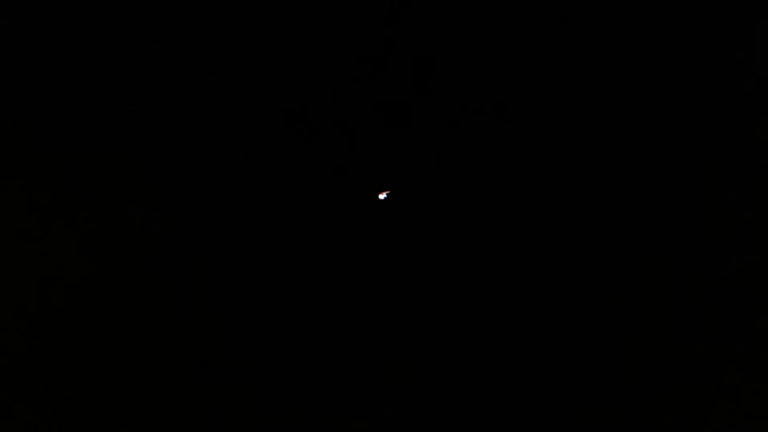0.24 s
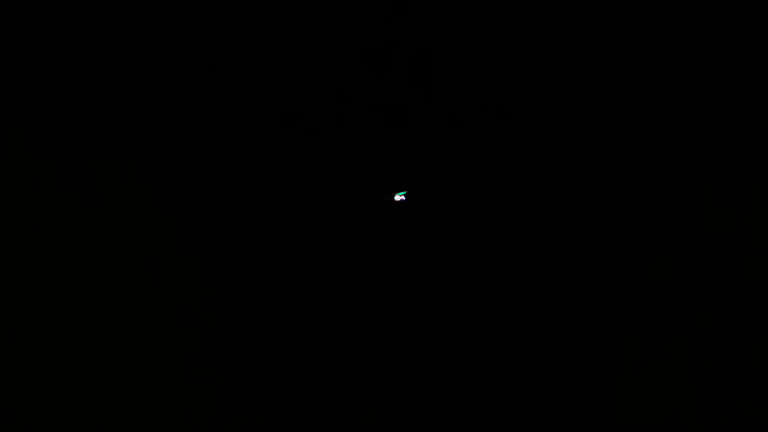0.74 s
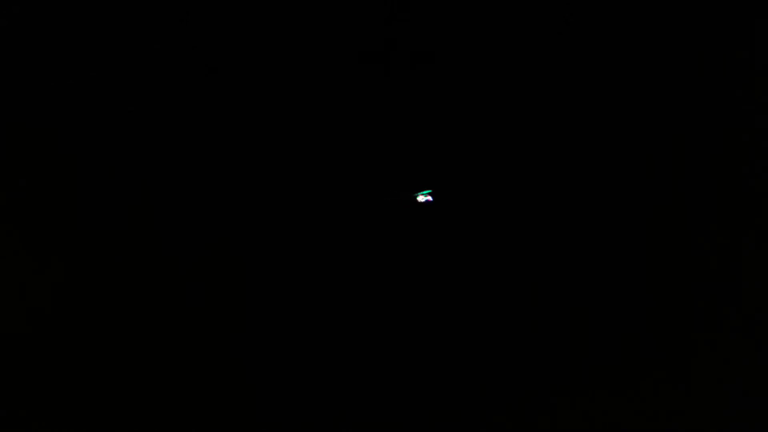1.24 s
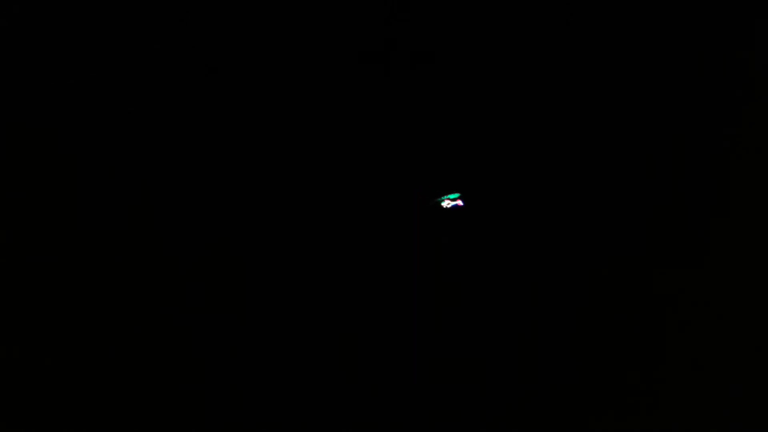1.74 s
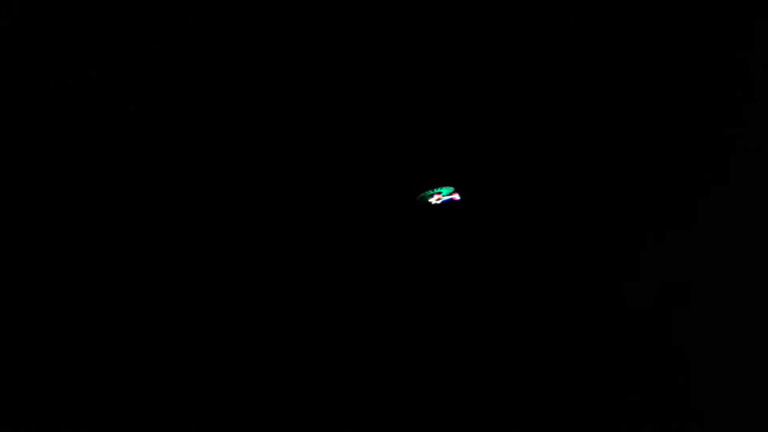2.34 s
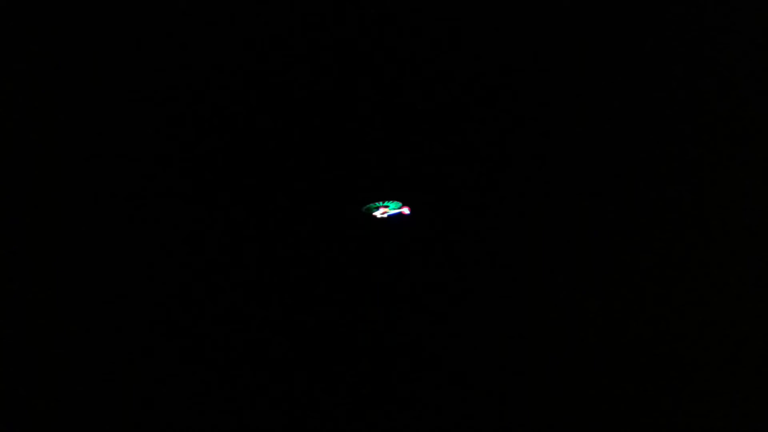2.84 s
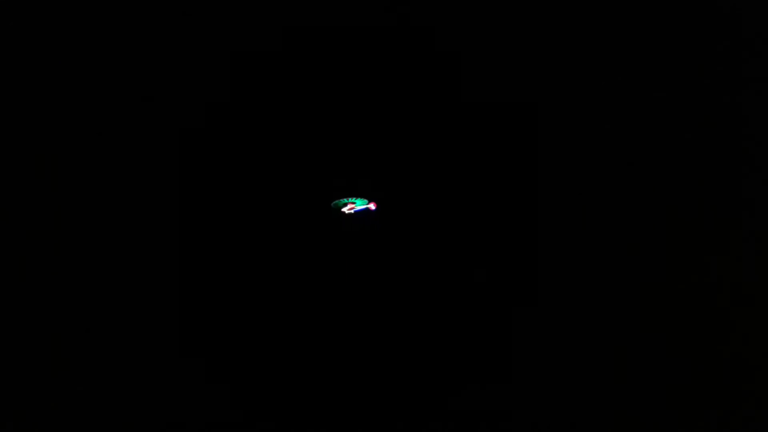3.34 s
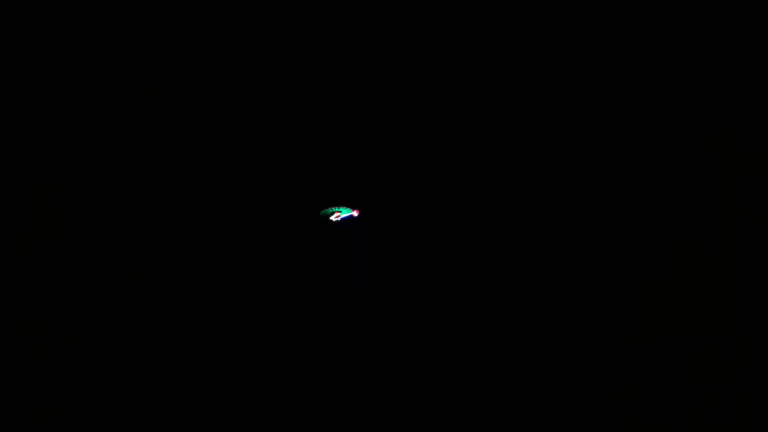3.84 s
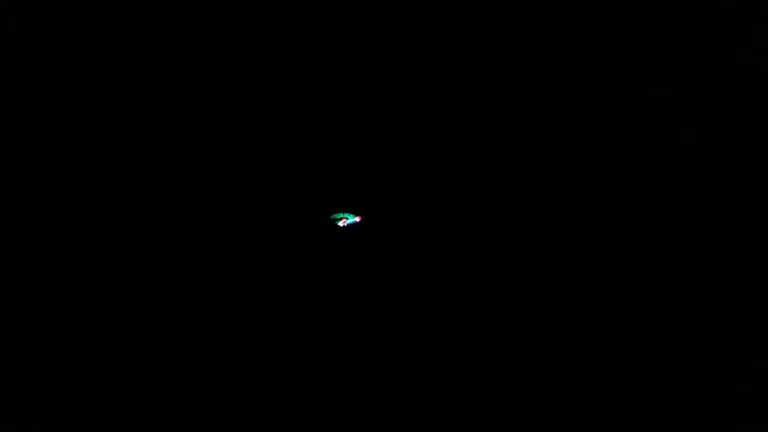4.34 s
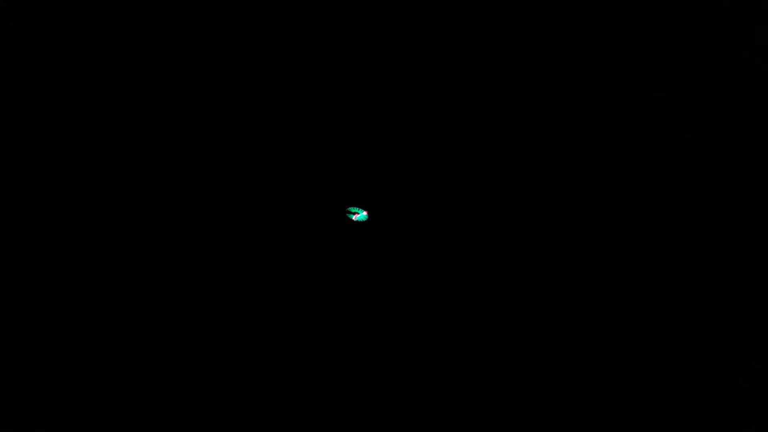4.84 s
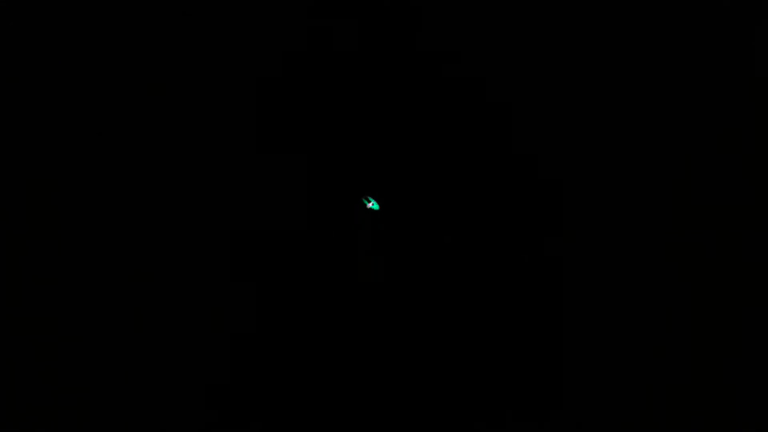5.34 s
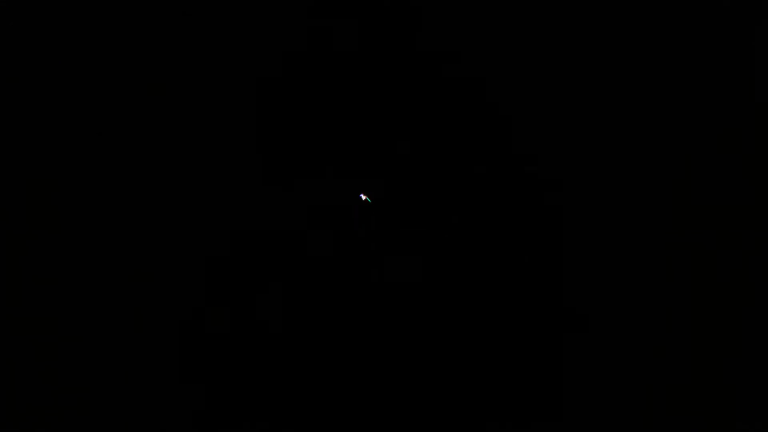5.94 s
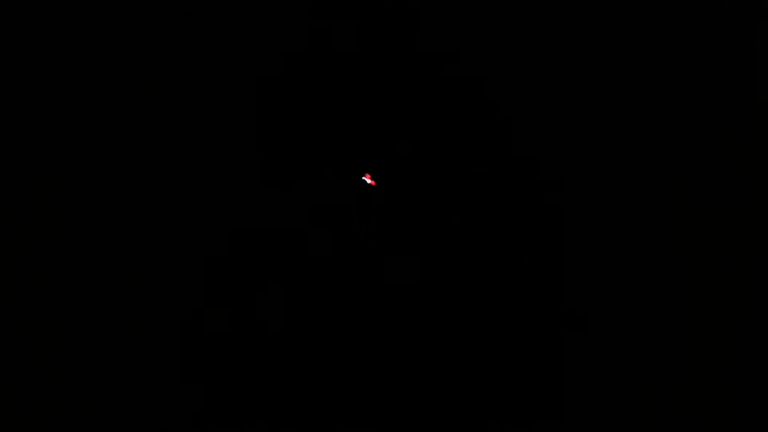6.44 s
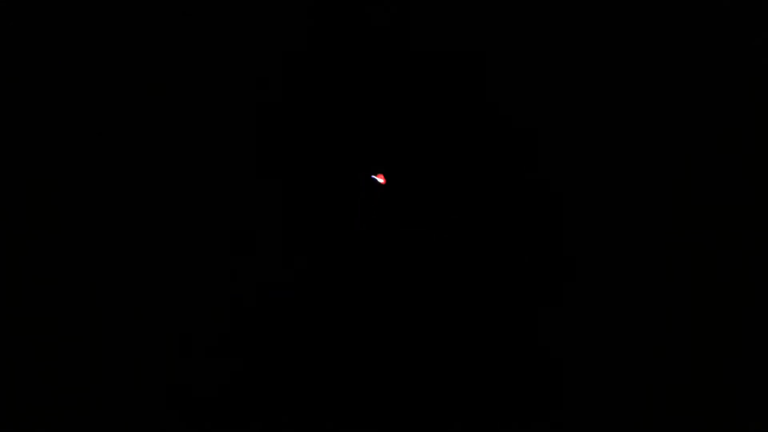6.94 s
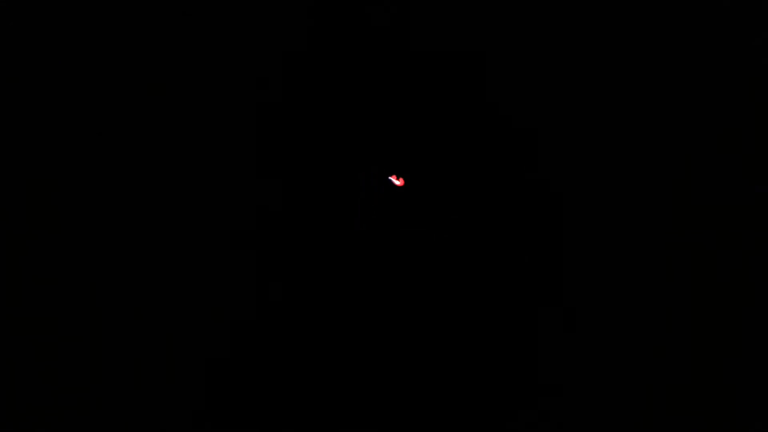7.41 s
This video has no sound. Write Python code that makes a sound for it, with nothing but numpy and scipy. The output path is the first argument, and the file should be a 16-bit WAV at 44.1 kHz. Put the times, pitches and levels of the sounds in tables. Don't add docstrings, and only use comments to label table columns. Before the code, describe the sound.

In the open on a breezy night, a small electric model helicopter flies some way from a handheld stereo microphone. At 0 s its tail rotor drones with a steady nasal buzz over soft blade rush, while a few wind knocks hit the left side. From 1 s the rush builds and thin gear whines emerge. Between 2 and 3.3 s it is loudest, a bright hissing wash with a sliding, hollow ground echo; the pitch glides gradually down. Hard gusts slam the right side from about 1.9 to 3.5 s, thudding and crackling into overload. From 3.5 s the rush ebbs and separate high whines glint in turn, clear around 5 s, as more slaps hit the right at 4.8 to 5.5 s. Near 6 s the rush is faintest and the whine lowest. Then the buzzing drone grows again and pitch climbs slightly until 7.6 s, cutting off while still flying.

```python
import sys
import numpy as np
from scipy import signal
from scipy.fft import rfft, irfft
from scipy.io import wavfile
from scipy.ndimage import uniform_filter1d, map_coordinates

SR = 44100
rng = np.random.default_rng(int(sys.argv[2]) if len(sys.argv) > 2 else 0)


def file_out(sig):
    cols = np.atleast_2d(sig).T
    lim = np.clip(cols, -1, 1)
    pcm = np.round(lim * 32767).astype(np.int16)
    wavfile.write(sys.argv[1], SR, pcm)


def gain_from_db(level_db):
    decades = np.asarray(level_db, float) / 20
    return 10 ** decades


N = 338247
TIME = np.arange(N) / SR

# time in seconds, rush level in dB, extra treble in dB.
RUSH_PASS = [(0, -43.5, -1.5), (.45, -42.5, -1), (.87, -39.5, -1), (1.41, -35, 1), (1.81, -35.5, 1),
             (2.11, -31.5, 5.5), (2.38, -28, -0.5), (2.63, -31, 1.5), (3.05, -25.5, 1.5), (3.35, -32, 4),
             (4.1, -34, 2.5), (4.6, -34.5, 2), (5.25, -41, 8), (5.95, -48, 6.5), (6.34, -46, 9),
             (6.66, -43, 0), (7.28, -40, -4.5), (7.67, -40.5, -3)]


def curves(table):
    s, *columns = np.transpose(table)
    return [np.interp(TIME, s, c) for c in columns]


def unit(x):
    return x / np.sqrt(np.mean(x ** 2))


def walk(rate):
    hold = int(SR / rate)
    steps = np.repeat(rng.standard_normal(N // hold + 1), hold)
    return 1.36 * uniform_filter1d(uniform_filter1d(steps, hold), hold)[:N]


def delayed(x, samples):
    return map_coordinates(x, [np.arange(N) - samples], order=3, mode="nearest")


def butter(x, hz, kind, order=2):
    return signal.sosfilt(signal.butter(order, hz, kind, fs=SR, output="sos"), x)


def night_air():
    noise = rng.standard_normal((2, N))
    rumble = gain_from_db(-30) * butter(noise, [110, 260], "band", order=2)
    hiss = gain_from_db(-57.5) * butter(noise, 13500, "low", order=1)
    return rumble + hiss


def wind(gusts, slaps):
    power = np.zeros(N)
    for s, db, ms in gusts:
        reach_s, width_s = ms / 300, 0.88 * ms / 1000
        near = slice(max(int((s - reach_s) * SR), 0), int((s + reach_s) * SR))
        power[near] += gain_from_db(2 * db) * np.exp(-((TIME[near] - s) / width_s) ** 2)
    stir_length = int(.09 * SR)
    stir = uniform_filter1d(uniform_filter1d(power, stir_length), stir_length)
    speed = np.sqrt(power + gain_from_db(-25.5) * np.abs(stir) + gain_from_db(-100))

    eddies_per_s = 650
    eddies = unit((rng.random(N) < eddies_per_s / SR) * rng.standard_normal(N)) * speed
    bright = np.clip(2.76 * speed ** 0.9, 0, 1)
    slow_flow = gain_from_db(21.0) * butter(eddies * (1 - bright), 329.0, "low", order=3)
    fast_flow = gain_from_db(17.0) * butter(eddies * bright, 481, "low", order=3)
    flow = 0.91 * np.tanh((slow_flow + fast_flow) / 0.87)

    hits = np.zeros(N)
    s, db = np.transpose(slaps)
    hits[(s * SR).astype(int)] = gain_from_db(db + 41.5) * rng.choice([-1, 1], len(s))
    return butter(flow + butter(hits, 870, "low", order=4), 194.2, "high", order=5)


def wind_left():
    # time in seconds, level in dB, length in ms.
    gusts = [(0.026, -9, 11), (0.082, -16.5, 21), (0.154, -32, 8.8), (0.184, -4.5, 5), (0.208, -32, 6.7),
             (0.269, -33.5, 8.5), (0.625, -30, 19), (0.742, -28, 15), (0.816, -23.5, 9.5),
             (0.866, -20.5, 18.5), (0.982, -26.5, 17), (1.323, -37, 27), (1.425, -29, 26),
             (1.624, -27, 14.5), (2.652, -31, 25), (2.714, -31, 10), (3.017, -32, 39), (3.231, -27, 12),
             (5.027, -29, 9.1), (5.082, -36, 11), (5.116, -21, 6.7), (5.19, -22, 8.6), (5.366, -31, 10),
             (6.22, -24.5, 8.1)]
    # time in seconds, level in dB.
    slaps = [
        (0.021, -22.5),
        (0.1843, -16.5),
    ]
    return wind(gusts, slaps)


def wind_right():
    # time in seconds, level in dB, length in ms.
    gusts = [(.788, -20.5, 12), (1.247, -13.5, 19), (1.906, -19, 28), (1.952, -9.5, 14.5), (2.017, -15, 42),
             (2.101, -8.5, 14), (2.177, -12, 17), (2.233, -10.5, 35), (2.337, -15.5, 48), (2.426, -5.5, 55),
             (2.496, -1, 4.9), (2.602, -4, 31), (2.871, -21.5, 15), (2.999, -8.5, 29), (3.065, -2, 13.7),
             (3.207, -16, 20), (4.182, -22, 32), (4.348, -31, 15), (4.436, -29.5, 26), (4.616, -27.5, 14),
             (4.845, -8.5, 29), (5.043, -10.5, 26), (5.162, -17.5, 19), (5.19, -9.5, 11), (5.252, -19, 14),
             (5.873, -24, 14), (6.256, -34.5, 31), (7.451, -24, 4.7), (5.76, -36.5, 14)]
    # time in seconds, level in dB.
    puffs = [(0.975, -24), (1.149, -23.5), (1.199, -28), (2.069, -27), (2.135, -22.5), (2.65, -5),
             (2.698, -3.5), (2.73, -4), (2.78, -6), (2.901, -9.5), (2.967, -9), (3.122, -16.5),
             (3.241, -29), (3.39, -16.5), (3.433, -21), (3.486, -19), (3.636, -25), (3.673, -20),
             (4.307, -21.5), (4.494, -26.5), (4.77, -22), (4.796, -13), (4.929, -25), (5.074, -5),
             (5.112, -14), (5.297, -14), (5.387, -13.5), (5.476, -19), (7.591, -25)]
    puff_ms = 5.3
    # time in seconds, level in dB.
    slaps = [(2.4544, -14.5), (2.497, -15.5), (2.5642, -5.5), (2.5726, -14), (2.589, -13), (2.598, -11.5),
             (2.607, -6), (2.6501, -7.5), (2.7048, -12), (2.7303, -8), (3.0559, -8), (4.771, -23),
             (4.799, -15.5), (4.8234, -16), (4.843, -12), (4.851, -15), (4.872, -16), (5.0068, -14),
             (5.025, -15), (5.0326, -11), (5.0694, -19), (5.0783, -12.5), (5.1075, -18), (5.1623, -11.5),
             (5.179, -19), (5.1891, -1.5), (5.2927, -18.5)]
    return wind([*gusts, *[(s, db, puff_ms) for s, db in puffs]], slaps)


def rush(turns):
    # pitch in Hz, level in dB per Hz.
    rush_colour = [(100, -35.5), (300, -25.5), (700, -10), (1500, -6), (2900, -10), (3900, 10),
                   (4600, -7.5), (5600, -22.5), (7000, -20.5), (8200, -25.5), (9600, -37), (10600, -45),
                   (15000, -59)]
    level_db, edge_db = curves(RUSH_PASS)
    bite_db = 7 + 0.27 * edge_db
    air_db = -8 + 0.74 * edge_db

    even_n = N + N % 2
    hz = np.fft.rfftfreq(even_n, 1 / SR)[1:]
    colour_hz, colour_db = np.transpose(rush_colour)
    shape = np.r_[0, gain_from_db(np.interp(np.log(hz), np.log(colour_hz), colour_db))]
    noise = irfft(rfft(rng.standard_normal((3, even_n))) * shape)[:, :N]

    body = unit(butter(noise, 3087, "low", order=4)) * gain_from_db(level_db - 0.5 + 0.16 * walk(6.8))
    bite = unit(butter(noise, [2800, 5200], "band", order=3)) * gain_from_db(level_db + bite_db - 6.5 + 0.13 * walk(12))
    air = unit(butter(noise, 5176, "high", order=4)) * gain_from_db(level_db + air_db + 1.5 + 1.1 * walk(9.9))
    throb_db = 1.0 * np.sin(2 * np.pi * turns * .187)
    swell_db = .9 * walk(14) + throb_db
    return (body + bite + air) * gain_from_db(swell_db)


def tone(turns, order, db, flutter_db, loose=1):
    level = np.sqrt(2) * gain_from_db(db + flutter_db * walk(25))
    return level * np.cos(2 * np.pi * (order * turns + loose * rng.random()))


def tail_rotor(turns):
    # time in seconds, level in dB, sharpness of the pulse in dB per octave, even over odd harmonics in dB.
    tail = [(0, -39, -13, -4), (.3, -45.5, -2, -0.5), (1.3, -41.5, -1, 6.5), (2, -44, -2.5, 6.5),
            (2.6, -42.5, 1, 3), (2.95, -40.5, 1.5, 4.5), (3.8, -48, 2.5, 2.5), (4.15, -50.5, 0.5, 7),
            (4.42, -48.5, 2.5, -2), (5, -56, 2, 0), (5.3, -58.5, 5, -3), (5.7, -61.5, 3, 5),
            (6.2, -54, -0.5, -3), (6.5, -49.5, 0.5, 1), (7.08, -46, 0.5, -1), (7.67, -42.5, 0, -0.5)]
    tail_swells = {3: (6.33, 9.2, 0.79), 4: (0.91, 4.2, 0.39), 5: (6.7, 7, 0.43), 7: (7.31, 7.5, 0.26)}
    blade_turns = turns * .9537
    level_db, sharp_db, even_db = curves(tail)
    share_db = [-3, -4.5, -8, -4.5, -5.0, -8, -10.0] + [-10 - 2.55 * k for k in range(6)]
    for harmonic, (s, gain_db, width) in tail_swells.items():
        share_db[harmonic - 1] = share_db[harmonic - 1] + gain_db * np.exp(-((TIME - s) / width) ** 2)

    drone = np.zeros(N)
    for k, db in enumerate(share_db):
        pulse_db = sharp_db * np.log2(max(k, 1)) - even_db / 2 * (-1) ** k
        drift_db = 1.2 * walk(2.405)
        drone += tone(blade_turns, k + 1, level_db + db + pulse_db + drift_db, flutter_db=1.5, loose=0.42)
    return drone


def glints(lobes, off_beam_db):
    t = TIME[::128]
    beam = sum(gain_from_db(2 * db) * np.exp(-((t - s) / width) ** 2) for s, db, width in lobes)
    off_beam = gain_from_db(2 * (curves(RUSH_PASS)[0] + off_beam_db))
    return 10 * np.log10(off_beam + np.interp(TIME, t, beam))


def gears(turns):
    # time in seconds, peak in dB, half width in seconds (its sign is ignored).
    mesh = [(.5, -62, 1), (1.402, -41.5, 0.08), (2.1, -38.5, 0.32), (3.05, -30.5, 0.17), (3.83, -33, 0.18),
            (4.33, -37, 0.12), (4.98, -39, 0.23), (5.9, -41.5, 0.13), (6.43, -35.5, 0.19),
            (6.85, -40.5, 0.2)]
    mesh_side = [(1.552, -53, 0.33), (2.08, -54, 0.41), (2.63, -47, 0.27), (3.05, -39, 0.12),
                 (3.44, -36, 0.27), (3.85, -41, 0.094), (4.42, -42.5, .18), (4.972, -41, 0.25),
                 (5.7, -51, 0.36), (6.352, -45, 0.16), (7.4, -52.5, 0.75)]
    motor = [(.2, -47.5, .08), (.98, -52, .08), (2.5, -48, .3), (3.15, -55, .1), (4.33, -50, .09),
             (4.75, -42.5, .08), (4.98, -33, 0.12), (5.3, -39, 0.1), (5.95, -41.5, 0.17),
             (6.37, -43.5, 0.11)]
    tail_drive = [(.39, -46, .1), (1.72, -41, 0.27), (3.129, -34, 0.22), (4.128, -36.5, 0.093),
                  (4.55, -40, .12), (5.31, -40.5, .07), (5.97, -43, 0.08), (6.468, -37, 0.23)]
    overtone = [(2.36, -48, 0.088), (2.56, -58, .07), (2.95, -45, .07), (4.8, -47, 0.34),
                (5.31, -43.5, 0.085), (5.88, -55, 0.2), (7.05, -60, 0.23)]
    third_mesh = [(1.4, -67, 0.17), (1.902, -73, .2), (2.35, -53.5, 0.34), (3.12, -52, 0.11), (4.2, -62, 1),
                  (5.4, -68, .15), (6.3, -70, 0.16)]
    upper = [(.72, -58, -7), (1.369, -55, -0.5), (3.6, -50, 1.3), (4.652, -39.5, .5), (5.66, -45, -3),
             (6.32, -49.5, -0.6), (7.3, -62, 1)]
    high_band = [
        (1.5, -72, 0.22),
        (2.1, -47, 0.39),
        (3.1, -50, .25),
        (4.4, -53, .2),
    ]
    # level between glints, in dB against the rush.
    off_beam = [-9.5, -31, -23, -27, -23, -44, -44]
    orders_of = {1: [14, 28, 27.39, 28.62, 26], 2: [15, 14.62, 34, 13], 3: [10, 11, 7, 8], 4: [13.38, 17.38,
                 19.38], 5: [18, 17, 18.62], 6: [42, 41.38, 40.77, 42.62, 40.1], 7: [20, 21, 22, 20.62, 24,
                 19]}
    order_db = [
        [2, -18, -29.5, -27, -39],
        [2.5, 1, -40, -4.5],
        [0, -11, -19, -19],
        [-1.5, -17, -13],
        [5, -36, -6],
        [3, -6, -3, -12, -12],
        [-5.5, -8.5, -32, -23, -21, -13],
    ]
    lobes = (mesh, mesh_side, motor, tail_drive, overtone, third_mesh, upper)
    family_db = [glints(*f) for f in zip(lobes, off_beam)]
    whine = np.zeros(N)
    for level_db, orders, offsets in zip(family_db, orders_of.values(), order_db):
        for order, db in zip(orders, offsets):
            whine += tone(turns, order, level_db + db, flutter_db=2.0)

    errors = rng.standard_normal(N)
    smear = unit(butter(errors, 330, "low", order=4)) * np.sin(2 * np.pi * 41.5 * turns)
    smear = smear * gain_from_db(family_db[5] + 7.0)
    band = unit(butter(errors[::-1], 200, "low", order=4)) * np.sin(2 * np.pi * 34.6 * turns)
    band = band * gain_from_db(glints(high_band, off_beam_db=-49))
    return whine + band + smear


def helicopter():
    # time in seconds, turns per second in Hz.
    shaft = [(0, 303.95), (.5, 304.9), (1.2, 304.17), (1.6, 302.61), (2, 300.16), (2.4, 296.64),
             (2.8, 290.8), (3.6, 282.6), (4, 280.18), (4.8, 277.21), (5.5, 274.05), (6, 273.24),
             (6.4, 274.61), (6.8, 277.02), (7.67, 284.3)]
    # time in seconds, lag of the ground echo in ms.
    ground = [(0, 2.67), (1.2, 3.06), (2.3, 3.46), (3.4, 3.3), (4.5, 2.63), (5.5, 2.59), (6.5, 3.08),
              (7.67, 3.5)]
    # lag in ms, share of the direct sound.
    body_echo = (1.6, .55)
    turns = np.cumsum(curves(shaft)[0]) / SR
    shared, *spread = rush(turns)
    ground_echo = gain_from_db(-7.5) * delayed(shared, curves(ground)[0] * SR / 1000)
    holder_echo = body_echo[1] * delayed(shared, body_echo[0] * SR / 1000)
    return shared + ground_echo + holder_echo + gears(turns) + tail_rotor(turns), spread


def scene():
    # lag in ms, left share, right share.
    casing = [
        (.12, 0.38, 0.3),
        (.24, 0.083, 0.24),
        (0.449, 0.35, 0.24),
        (1.102, 0.21, -0.0035),
    ]
    # time in seconds, lag in samples.
    port_lag = [
        (0, 0),
        (1, .6),
        (2.2, 2.5),
        (2.8, .6),
        (7.67, 0),
    ]
    craft, spread = helicopter()
    bounces = sum(np.outer(share, delayed(craft, ms * SR / 1000)) for ms, *share in casing)
    left, right = craft + bounces
    right = delayed(right, curves(port_lag)[0])
    spread = gain_from_db(7.0) * butter(spread, 4000, "high", order=1)
    pan_db = 2
    left = (left + spread[0]) * gain_from_db(pan_db / 2) + wind_left()
    right = (right + spread[1]) * gain_from_db(-pan_db / 2) + wind_right()
    return np.array([left, right]) + night_air()


def roll_off(x):
    return signal.sosfilt(signal.butter(12, 14700, fs=SR, output="sos"), x)


def record(dry):
    clipped = np.clip(dry, -1, 1)
    return roll_off(butter(clipped, 60, "high", order=1))


dry = scene()
out = record(dry)
file_out(out)
```